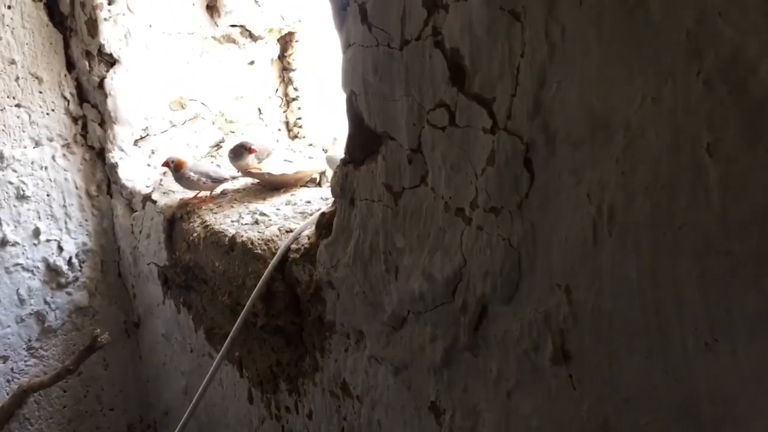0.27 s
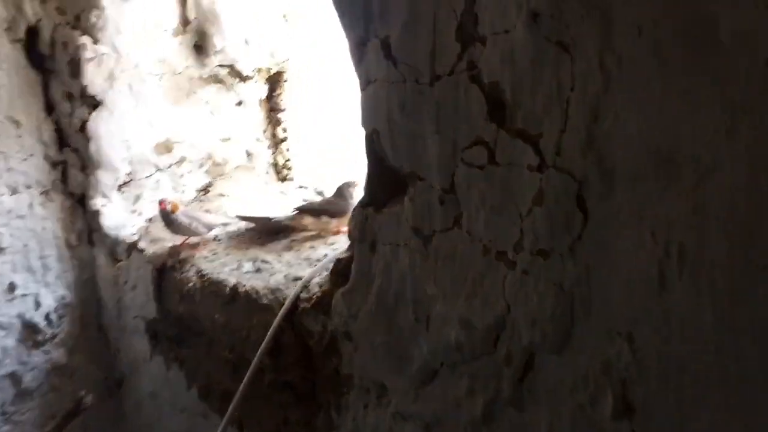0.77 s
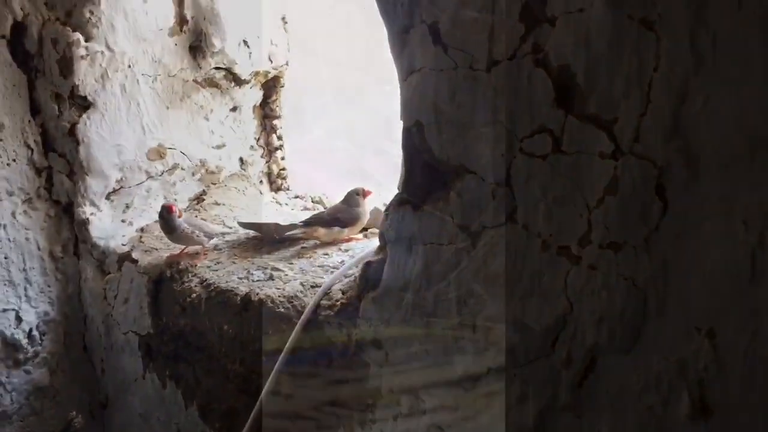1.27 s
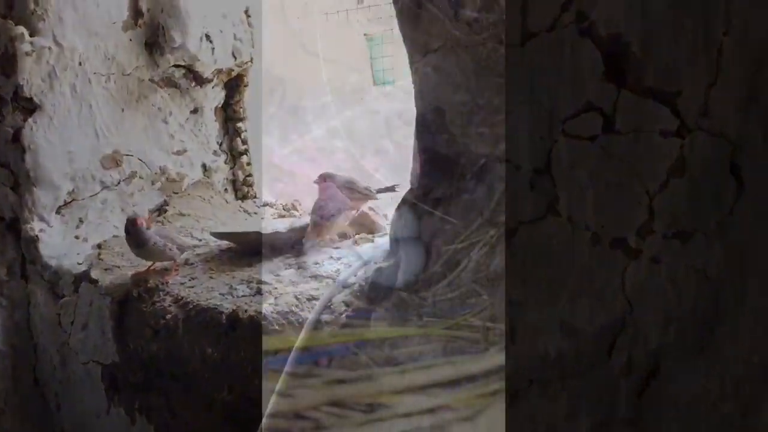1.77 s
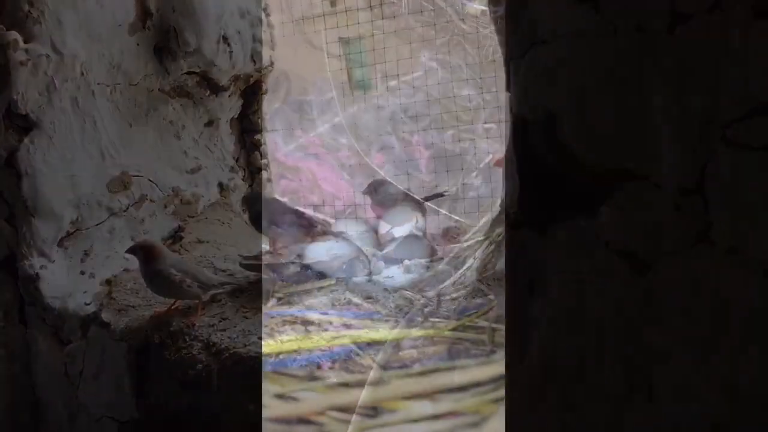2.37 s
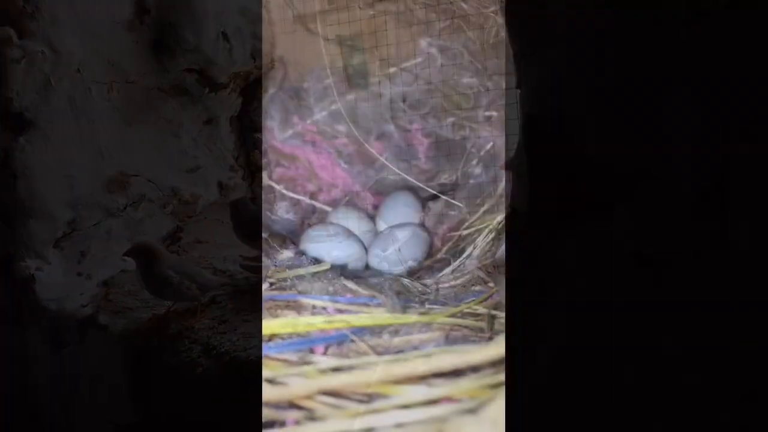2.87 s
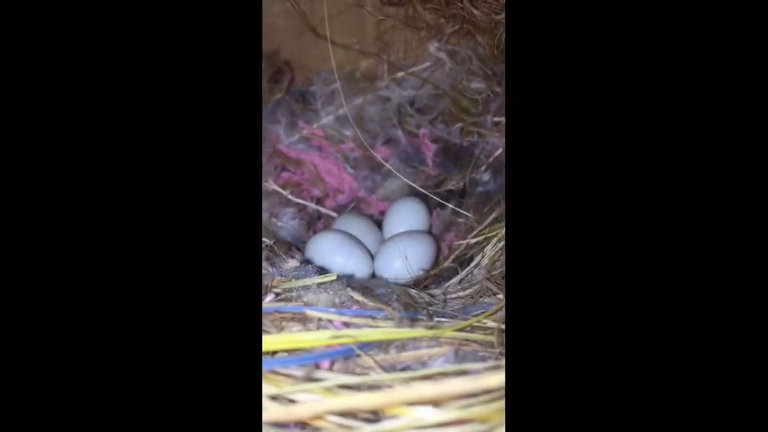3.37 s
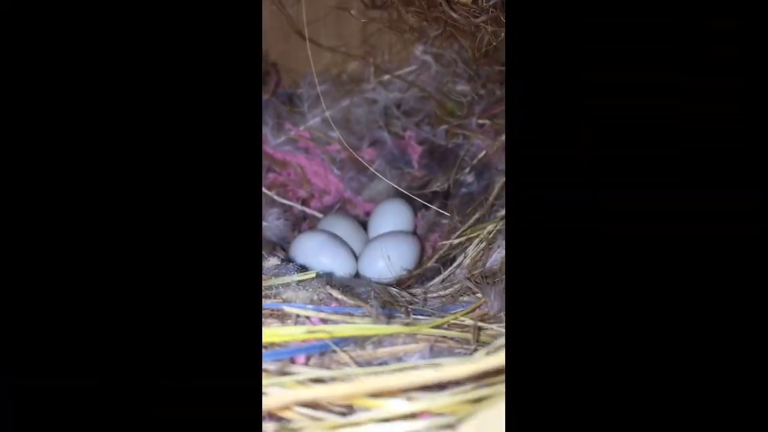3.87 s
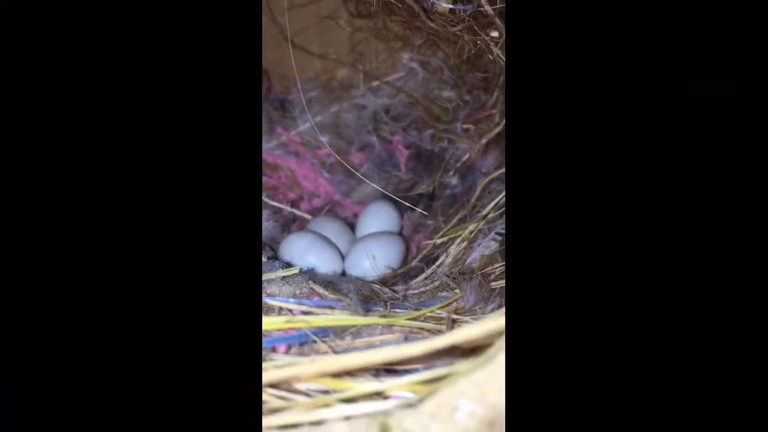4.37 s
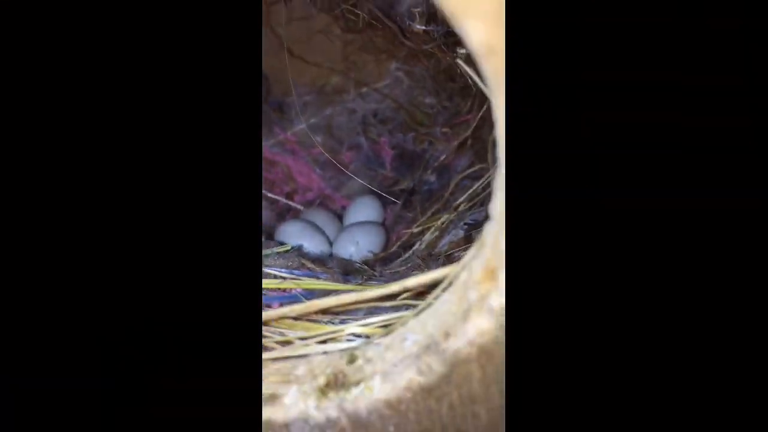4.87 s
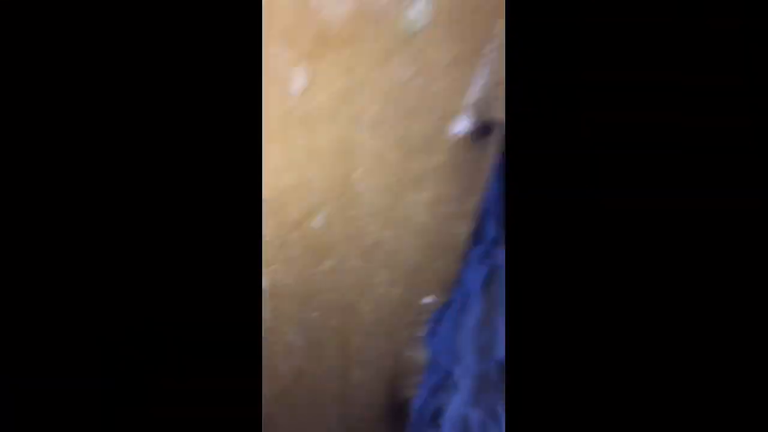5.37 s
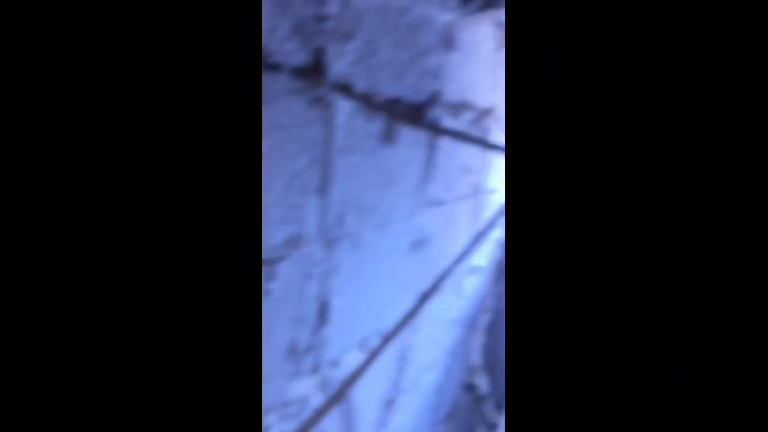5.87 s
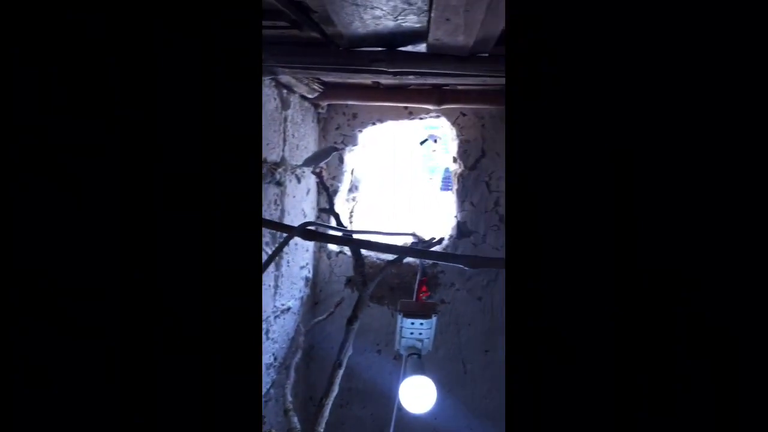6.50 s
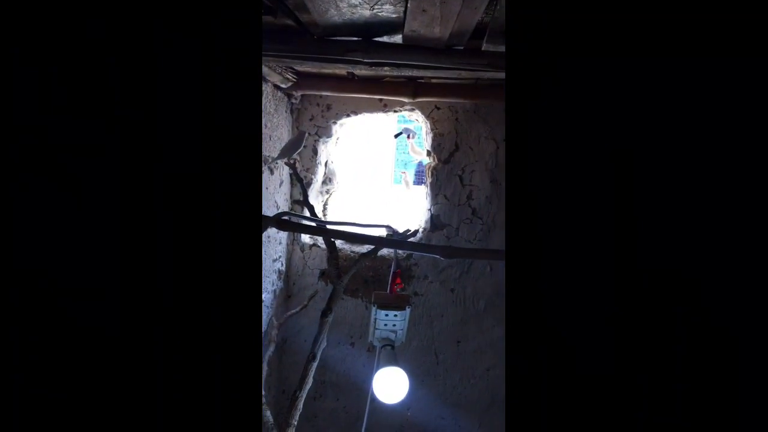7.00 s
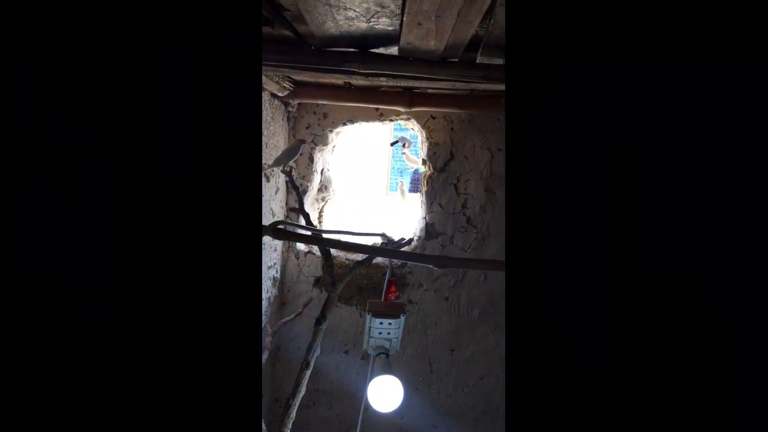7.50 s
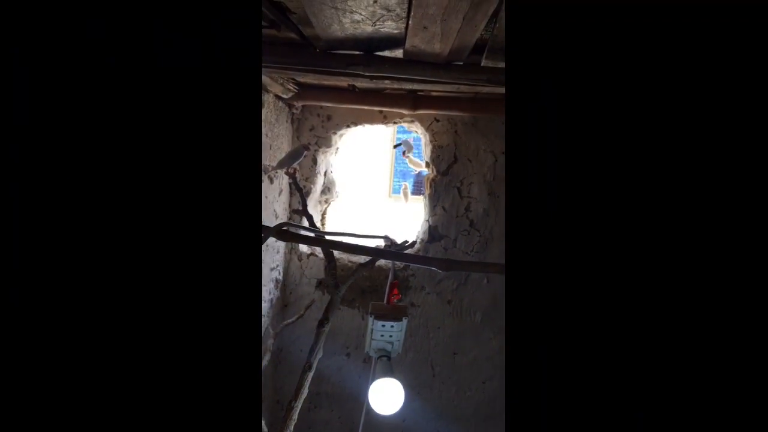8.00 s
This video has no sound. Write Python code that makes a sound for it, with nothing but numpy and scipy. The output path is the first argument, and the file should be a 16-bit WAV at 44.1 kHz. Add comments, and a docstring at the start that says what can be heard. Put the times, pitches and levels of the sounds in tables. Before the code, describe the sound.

Inside a small plastered room, finches call close to a hand-held microphone, with quick dense wall echoes. Short nasal chips, each flicking up then dropping, start at 0.2 s; a tumbling falling whistle phrase with a soft mew comes near 0.6 s, and more chips at 0.9-1.3 s. A brief wing flutter passes around 1.75 s. From 2.1 s chips return, then a slower whistled tumble at 2.4 s and two harsh, shaky screeches at 2.75 and 2.93 s, while low handling rumble swells. A chip is cut short near 3.36 s. Three chips bunch at 3.8 s; after a lull, chips continue from 4.4 to 6.1 s, some bright and rough, with a low mew at 5.9 s. Rumble and room noise surge near 6.2 s, wings whirr in several quick beats around 6.5 s, then chips and quiet whistled phrases at 6.6 and 7.0 s lead to final chips until about 8.1 s. Faint ticks and hiss throughout.

```python
"""Finches in a plastered room

Finches call close by: short arching chips, tumbling whistled phrases, nasal mews and two harsh screeches.
The voices are harmonic stacks on moving pitch tracks, shaded by throat, beak and breath noise.
Wings whirr as a bird flies across and feet tick on a ledge, all as shaped noise with wall echoes.
The hand-held microphone rumbles as it is moved, over faint room noise and hiss."""
import sys
import numpy as np
from scipy import signal
from scipy.fft import rfft, irfft, next_fast_len
from scipy.io import wavfile
from scipy.ndimage import uniform_filter1d

SR = 44100
rng = np.random.default_rng(int(sys.argv[2]) if len(sys.argv) > 2 else 0)


def generate_wav(signal):
    """Clip the signal to [-1, 1] and save it as 16-bit WAV at the path in sys.argv[1]."""
    frames = np.transpose(np.atleast_2d(signal))
    scaled = np.clip(frames, -1, 1) * 32767
    pcm = np.round(scaled).astype(np.int16)
    wavfile.write(sys.argv[1], SR, pcm)


N = 363472
CALL_SIZE = 16384   # samples rendered per sound, echoes included
LEVEL_WINDOW_S = .035   # opening of a sound over which its level is set


def from_db(db):
    """Decibels to gain."""
    return 10 ** (np.asarray(db) / 20)


def rms_one(x):
    """Scale to unit rms."""
    return x / np.sqrt(np.mean(x ** 2) + 1e-20)


def in_time(rows):
    """Each level column of an automation table at every sample."""
    t, *columns = np.transpose(rows)
    return [np.interp(np.arange(N) / SR, t, column) for column in columns]


def at_hz(points, hz):
    """Read a spectrum on a log-frequency axis."""
    f, value = np.transpose(points)
    return np.interp(np.log(np.maximum(hz, 1)), np.log(f), value)


def coloured_noise(spectrum, size):
    """Noise of unit rms with the given spectrum."""
    padded = next_fast_len(size)
    gain = from_db(at_hz(spectrum, np.fft.rfftfreq(padded, 1 / SR)))
    white = rfft(rng.standard_normal(padded))
    return rms_one(irfft(white * gain, padded)[:size])


def wobble(rate_hz):
    """Random unsteadiness over one call, slower than the given rate, spread 1."""
    lowpass = signal.butter(2, rate_hz, fs=SR, output="sos")
    return rms_one(signal.sosfilt(lowpass, rng.standard_normal(CALL_SIZE)))


def progress(length_s):
    """Runs from 0 to 1 while a call lasts, then holds."""
    return np.clip(np.arange(CALL_SIZE) / SR / max(length_s, .004), 0, 1)


def glide(start, end, u):
    """Straight slide from start to end."""
    return start + (end - start) * u


def swell(u, edge):
    """Rounded rise and fall, each taking a share of the call."""
    return np.sin(np.pi / 2 * np.clip(np.minimum(u, 1 - u) / edge, 0, 1)) ** 2


def harmonics(pitch, level_db, count):
    """Harmonic stack on a pitch track; level_db(k, Hz) sets each partial."""
    phase = 2 * np.pi * np.cumsum(pitch) / SR
    voice = np.zeros(len(pitch))
    for k in range(1, count + 1):
        hz = k * pitch
        voice += from_db(level_db(k, hz)) * (hz < SR / 2) * np.sin(k * phase)   # no aliases
    return voice


# decay of the wall echoes, band by band: f/Hz, reverberation time/s
WALL_DECAY = [(500, 0.17), (2000, 0.14), (4000, 0.13), (8000, 0.09), (15000, 0.15)]
ECHO_DB = 4   # total echo energy against the direct sound


def room(x, build_s=0.00074, late_db=-27, late_t60=0.27):
    """Direct sound plus dense wall echoes, different for every sound, and a faint late tail."""
    t, hz = np.arange(CALL_SIZE) / SR, np.fft.rfftfreq(CALL_SIZE, 1 / SR)
    white = rfft(rng.standard_normal(CALL_SIZE))
    centres = [f for f, t60 in WALL_DECAY]
    echoes = np.zeros(CALL_SIZE)
    for share, (f, t60) in zip(np.eye(len(centres)), WALL_DECAY):
        band = irfft(white * np.interp(hz, centres, share))
        early = 1000 ** (-t / t60)
        late = from_db(late_db) * 1000 ** (-t / late_t60)
        echoes += band * (early + late)
    echoes *= 1 - np.exp(-t / build_s)
    response = from_db(ECHO_DB) * echoes / np.linalg.norm(echoes)
    return x + signal.fftconvolve(x, response)[:CALL_SIZE]


def add(out, t, sound, level_db):
    """Place a sound so that its opening has the given rms level."""
    start = max(round(t * SR), 0)
    opening = np.sqrt(np.mean(sound[:round(LEVEL_WINDOW_S * SR)] ** 2) + 1e-20)
    out[start:start + CALL_SIZE] += (from_db(level_db) / opening * sound)[:N - start]


# movement of the microphone: t/s, deep rumble level before trim/dB, flutter level before trim/dB
MIC_MOVEMENT = [(0.0, -50.0, -57.5), (0.33, -55.5, -63.0), (0.88, -55.5, -64), (1.0, -49.5, -57.0),
                (1.22, -59.0, -67.0), (1.28, -51.0, -68.0), (1.65, -53.5, -55.0), (1.73, -47, -38.5),
                (1.86, -46, -47), (1.95, -45, -38), (2.06, -45, -46), (2.23, -38, -39.5),
                (2.53, -36.5, -43.5), (2.58, -39.5, -53.5), (2.75, -40, -51), (3.03, -43.5, -45.5),
                (3.15, -47.5, -49), (3.62, -50, -50), (3.73, -46.0, -44.5), (4.24, -46.5, -45.5),
                (4.38, -56.5, -49.0), (4.44, -44.5, -41.5), (4.86, -58.0, -60.5), (5.16, -68.0, -62.5),
                (5.35, -57.0, -64.0), (5.4, -43.5, -43.0), (5.74, -49.0, -50.5), (5.79, -41.0, -47.0),
                (6.12, -46.5, -48.0), (6.2, -35.5, -37.5), (6.58, -45.5, -49.0), (7.0, -46, -51),
                (7.21, -45.5, -42), (7.34, -54.0, -55.0), (7.63, -55.0, -54.0), (7.74, -64.0, -69.0),
                (7.94, -66.5, -65.5), (8.07, -45.5, -52.5), (8.24, -62.0, -59.0)]
# colour of the deep rumble: f/Hz, level/dB
RUMBLE_COLOUR = [(20, -22), (40, 1), (65, 4), (90, 12), (120, 9.5), (150, -8), (220, -42)]
# colour of the flutter above it: f/Hz, level/dB
FLUTTER_COLOUR = [(90, -25), (145, 6.5), (200, 0.5), (300, -8), (400, -18), (550, -46.5), (900, -68)]


def handling(rumble_trim_db=-2.0, flutter_trim_db=-2.6, evenness=1.0):
    """Low rumble and flutter of the moving microphone, their strength following the movement."""
    def steady(spectrum):
        """Noise with its own swells ironed out."""
        noise = coloured_noise(spectrum, N)
        power = uniform_filter1d(noise ** 2, size=3000) + 1e-6
        return rms_one(noise / power ** (evenness / 2))

    rumble_db, flutter_db = in_time(MIC_MOVEMENT)
    rumble = from_db(rumble_db + rumble_trim_db) * steady(RUMBLE_COLOUR)
    flutter = from_db(flutter_db + flutter_trim_db) * steady(FLUTTER_COLOUR)
    return rumble + flutter


# background bed: t/s, room noise level/dB, hiss level/dB
BED_LEVELS = [(0, -72, -76), (1.24, -68, -76), (1.67, -71, -77), (2.08, -66, -73), (2.27, -51, -66),
              (2.45, -62, -68), (2.7, -63, -72), (2.94, -55, -71), (3.1, -67, -76.5), (4.4, -65.5, -75.5),
              (5.3, -67, -74), (5.78, -68, -66), (5.94, -49.5, -61.5), (6.4, -54, -64), (6.61, -49, -67),
              (6.89, -60, -67), (7.1, -57, -64.5), (7.5, -66, -73), (7.87, -70, -77), (8.08, -53, -65),
              (8.24, -70, -69)]
# colour of the room noise ahead of the resonances: f/Hz, level/dB
ROOM_NOISE_COLOUR = [(300, 7.5), (550, -1.5), (1000, 3.5), (1500, 0.5), (2400, 1.5), (3500, -4),
                     (5000, -17.5), (8000, -19.5)]
# colour of the hiss: f/Hz, level/dB
HISS_COLOUR = [(2500, -0.5), (4500, 4.5), (7000, 1), (10000, -5), (13000, -3), (16000, -14)]


def background():
    """Faint noise, ridged by the resonances of the room, and a smooth hiss."""
    room_db, hiss_db = in_time(BED_LEVELS)
    resonances = room(signal.unit_impulse(CALL_SIZE))
    noise = coloured_noise(ROOM_NOISE_COLOUR, N + CALL_SIZE - 1)
    air = rms_one(signal.fftconvolve(noise, resonances, "valid"))
    return from_db(room_db) * air + from_db(hiss_db) * coloured_noise(HISS_COLOUR, N)


# chips: t/s, length/s, pitch that scales the arch f/Hz, level before trim/dB,
# upper throat resonance/dB, treble from the open beak/dB, odd harmonics at the start/dB
CHIP_CALLS = [(.198, .022, 1144, -29.5, 4.5, 3, -11), (.908, .029, 1087, -35.5, 1.5, 10, 3),
              (1.198, .019, 1106, -30.7, .3, 2.5, -11), (1.297, .023, 1168, -27.5, .5, 3.2, -16),
              (2.073, .019, 1101, -28.5, 2.5, 2, -25), (2.153, .02, 1005, -36.5, -1, 0, -13),
              (2.25, .032, 1016, -38.5, -1.6, 1, -6), (2.846, .023, 1035, -30.5, 1, 8, -21),
              (3.234, .022, 1062, -36.5, -1, -5, -21), (3.342, .018, 1103, -39, 1, 3, 8),
              (3.455, .026, 1124, -35, -.5, -3, -25), (3.762, .022, 1158, -32, -2, -2.5, -34),
              (3.807, .023, 1432, -31.5, 4, 8, -28), (3.841, .027, 1266, -30.5, 2, 3, -30),
              (4.416, .028, 1400, -32.5, .5, 11, 2), (4.631, .019, 1138, -32.5, -3, -3, -16),
              (4.712, .024, 1144, -28.5, 0, .5, -21), (4.889, .024, 1530, -32.5, -2, 9.5, 1),
              (5.03, .024, 1172, -28.5, .5, 6.5, -14), (5.244, .027, 1174, -30, -.5, 8, -40),
              (5.415, .027, 1530, -28.5, 3.8, 12, 3.5), (5.741, .026, 1170, -27.5, 4.5, 8, -12),
              (5.861, .016, 1144, -31.5, 2.5, 5, -20), (5.897, .023, 1457, -33.5, -2, -12, 2),
              (6.121, .021, 1225, -26, 4.8, 8.5, -23), (6.764, .029, 1148, -28, 2.5, 4, -4),
              (6.901, .03, 1617, -29.5, 4, 14, 5.5), (7.332, .025, 1130, -31.5, .8, 2, -10),
              (7.548, .024, 1500, -31.5, 4.5, 12.5, 3.5), (7.576, .019, 1094, -38.5, -3, 8, -5),
              (7.61, .031, 1083, -35.5, -4.5, -4, 6), (7.77, .026, 1130, -33, .3, 1, -20),
              (7.926, .024, 1139, -28.5, 2, 8.5, 3.5), (8.069, .027, 1070, -38, -3, -4, 8)]
# pitch arch of one chip: share of its length, pitch ratio before the random bend
PITCH_ARCH = [(0, .82), (.22, .99), (.42, 1.01), (.6, .87), (0.802, .7), (1, 0.462)]
# the bird's throat and beak, shared with the mews: f/Hz, level/dB
THROAT_COLOUR = [(500, -66), (1000, -28.5), (1350, -6.5), (1800, 2.5), (2300, 1.5), (2750, 1), (3300, 3),
                 (4000, 0), (4700, -6.5), (5600, -18.5), (7000, -25.5), (9000, -29.5), (12000, -35),
                 (15500, -36)]
BREAK_S = 3.361   # chips begun before this moment stop dead here, echoes included
CHIP_JITTER = .036   # pitch jitter share once broken; half of it before
CLEAN_ODD_DB = -14   # odd-harmonic level at which the breath has its nominal level
# the hardest push comes at this share of a chip, later when the beak is wide
PUSH_SHARE, PUSH_PER_TREBLE_DB = .42, .01


def chips(breath_db=-12, harsh_breath=0.73, shimmer=0.34, start_force=.38, release_force=0.41,
          arch_spread=0.1983, top_share=0.2, lowest_hz=850, trim_db=-1.0):
    """The syrinx flicks up and down in pitch; at the hardest push it breaks an octave down and turns rough."""
    out = np.zeros(N)
    chip_highpass = signal.butter(2, lowest_hz, "highpass", fs=SR, output="sos")   # chips carry nothing below this
    for t, length, top_hz, level_db, upper_db, treble_db, odd_db in CHIP_CALLS:
        u = progress(length)
        push = np.clip(PUSH_SHARE + PUSH_PER_TREBLE_DB * treble_db, .2, .75)
        force = np.interp(u, [0, push / 3, push * 2 / 3, push, (1 + push) / 2, 1],
                          [0, start_force, .5, 1, release_force, 0])
        unbroken = np.clip(2 - 2 * u / push, 0, 1)   # odd harmonics lose their offset as this falls to 0
        beak = [(2300, 0.0038), (3300, upper_db), (4800, upper_db),
                (5600, treble_db), (8500, treble_db), (12000, top_share * treble_db)]
        throat = [(hz, db + at_hz(beak, hz)) for hz, db in THROAT_COLOUR]
        bend = 1 + arch_spread * rng.standard_normal()   # no two chips bend alike
        arch = np.interp(u, *np.transpose(PITCH_ARCH)) ** bend
        pitch = top_hz * arch * (1 + CHIP_JITTER * (1 - unbroken / 2) * wobble(640))
        voice = harmonics(pitch, lambda k, hz: at_hz(throat, hz) + k % 2 * odd_db * unbroken, count=13)
        # a chip that is broken from its very start is also the noisier one
        rasp_db = breath_db + harsh_breath * (odd_db - CLEAN_ODD_DB)
        rasp = from_db(rasp_db) * coloured_noise(throat, CALL_SIZE)
        sound = room((voice * (1 + shimmer * wobble(405)) + rasp) * force)
        sound = signal.sosfilt(chip_highpass, sound)
        if t < BREAK_S:
            sound = sound * (t + np.arange(CALL_SIZE) / SR < BREAK_S)
        add(out, t, sound, level_db + trim_db)
    return out


# claws and beaks ticking: t/s, level/dB
TICK_HITS = [(0.549, -53.5), (0.962, -49), (1.020, -63), (1.546, -60.5), (1.917, -53), (2.615, -50),
             (5.354, -60.5), (7.09, -53), (8.038, -60)]
# colour of a tick: f/Hz, level/dB
TICK_SPECTRUM = [(300, 4.5), (1000, -2), (3000, 6.5), (6000, -7.5), (10000, -9), (15000, -14)]


def ticks(decay_s=0.0069):
    """Brief dry contacts on plaster: noise that dies away exponentially."""
    out = np.zeros(N)
    decay = np.exp(-np.arange(CALL_SIZE) / SR / decay_s)
    for t, level_db in TICK_HITS:
        add(out, t, room(coloured_noise(TICK_SPECTRUM, CALL_SIZE) * decay), level_db)
    return out


# nasal, many-lined notes: t/s, length/s, start f/Hz, end f/Hz, level/dB,
# fundamental boost/dB, pitch jitter share
MEW_NOTES = [(.552, .144, 978, 980, -54, 31.5, .03), (.82, .017, 1054, 855, -59.5, 42, .04),
             (1.049, .009, 1300, 1580, -49.5, 21, .04), (1.47, .012, 1320, 1190, -59.5, 30, .04),
             (2.7, .066, 680, 750, -51.5, 12, .0055), (3.68, .02, 1000, 1280, -55, 25, .04),
             (5.92, .164, 544, 536, -53, 25, .019), (7.295, .036, 1070, 1050, -56, 33, .015),
             (8.115, .022, 900, 810, -57, 22, .022)]


def mews(edge=0.081):
    """Soft notes with a low pitch and many harmonics, coloured by the throat."""
    out = np.zeros(N)
    for t, length, start_hz, end_hz, level_db, fundamental_db, jitter in MEW_NOTES:
        u = progress(length)
        pitch = glide(start_hz, end_hz, u) * (1 + jitter * wobble(300))
        voice = harmonics(pitch, lambda k, hz: at_hz(THROAT_COLOUR, hz) + fundamental_db * (k == 1), count=12)
        add(out, t, room(voice * swell(u, edge)), level_db)
    return out


# tumbling phrase, five falling notes hopping between two registers, before each singing scales it:
# t from its start/s, length/s, start f/Hz, end f/Hz, relative level/dB
PHRASE_SHAPE = [(0, .035, 3400, 3020, 0), (.028, .024, 4050, 3700, -4.5), (.046, .021, 2850, 2150, -5),
                (.08, .023, 3330, 2950, -4), (.099, .029, 1980, 1620, -7)]
# each singing of it: t/s, duration factor, high-register pitch factor, low-register pitch factor,
# level before trim/dB
PHRASE_TAKES = [(.569, 1.0, .99, 1.04, -33.5), (2.419, 1.56, .91, .78, -31.5), (6.592, 1.12, 1.0, .89, -39),
                (7.011, 1.02, 1.02, .96, -37)]
REGISTER_SPLIT_HZ = 3100   # notes starting above this belong to the high register
NOTE_STRETCH = .45   # power of the phrase's duration factor by which its notes lengthen


def phrase_notes():
    """The one phrase, sung slower or faster, each of its two registers a little higher or lower."""
    notes = []
    for t, stretch, high, low, level_db in PHRASE_TAKES:
        for after, length, start_hz, end_hz, note_db in PHRASE_SHAPE:
            shift = high if start_hz > REGISTER_SPLIT_HZ else low
            note_length = length * stretch ** NOTE_STRETCH
            notes.append((t + after * stretch, note_length,
                          start_hz * shift, end_hz * shift, level_db + note_db))
    return notes


# single whistled notes, near and far: t/s, length/s, start f/Hz, end f/Hz, level before trim/dB
SINGLE_WHISTLES = [(.56, .017, 4570, 4400, -53.8), (2.393, .014, 2750, 3320, -38.5),
                   (2.405, .017, 2340, 1970, -41.3), (2.488, .025, 3500, 2900, -37),
                   (2.738, .018, 2850, 2940, -39.5), (2.823, .017, 1880, 1180, -44),
                   (3.045, .027, 3070, 2930, -43.5), (3.084, .032, 2670, 2390, -48.4),
                   (3.141, .014, 2075, 1750, -50), (3.861, .035, 2620, 2385, -43),
                   (3.9, .16, 1047, 850, -68), (4.18, .15, 2353, 2347, -69), (4.562, .11, 2495, 2400, -62),
                   (4.677, .022, 1360, 1170, -53.5), (4.762, .048, 1960, 1634, -52.5),
                   (5.393, .023, 2586, 3550, -29), (5.902, .011, 3140, 3084, -30),
                   (6.135, .02, 1020, 900, -52), (7.187, .012, 2544, 3520, -32.5),
                   (7.197, .009, 3500, 2300, -37)]
# airy rasp that rides on the whistles: f/Hz, level/dB
WHISTLE_AIR = [(800, -14), (2000, 2), (4000, 1), (5000, -18), (6500, -1), (9000, -5.5), (11000, -23),
               (15000, -25)]


def whistles(jitter=0.042, shimmer=0.46, overtone_db=-27, rasp_db=-24, octave_db=12, edge=0.11, trim_db=-1.0):
    """Nearly pure, quavering notes that slide and hop between two registers, louder where they are higher."""
    out = np.zeros(N)
    for t, length, start_hz, end_hz, level_db in phrase_notes() + list(SINGLE_WHISTLES):
        u = progress(length)
        slide = glide(start_hz, end_hz, u)
        height_gain = from_db(octave_db * np.log2(slide / start_hz))
        force = swell(u, edge) * height_gain * (1 + shimmer * wobble(280))
        if end_hz > start_hz:
            force = force * np.minimum(.15 + 1.3 * u, 1)   # rising notes swell from a soft start
        pitch = slide * (1 + jitter * wobble(490))
        voice = harmonics(pitch, lambda k, hz: overtone_db * np.log2(k), count=4)
        rasp = from_db(rasp_db) * coloured_noise(WHISTLE_AIR, CALL_SIZE)
        add(out, t, room((voice + rasp) * force), level_db + trim_db)
    return out


# bursts of wing beats: t of the loudest beat/s, beats before it, beats after it, level/dB,
# rise per beat/dB, fall per beat/dB, brightness/dB per octave
WING_BURSTS = [(1.75, 1, 2, -44, 16, 8, 1.2), (2.604, 0, 0, -53, 0, 0, 0), (6.27, 0, 1, -51, 0, 4, -1.5),
               (6.489, 2, 4, -36.5, 2.7, 4, 0), (7.57, 0, 0, -55, 0, 0, 0)]
BEAT_PERIOD_S, STROKE_S = .05, .043


def wing_beats():
    """Evenly spaced strokes that grow as the bird nears and fade as it leaves."""
    beats = []
    for t, before, after, level_db, rise_db, fall_db, tilt_db in WING_BURSTS:
        for k in range(-round(before), round(after) + 1):
            beat_db = level_db + min(k * rise_db, -k * fall_db)
            beats.append((t + k * BEAT_PERIOD_S, beat_db, tilt_db))
    return beats


# colour of a wing stroke before its brightness tilt: f/Hz, level/dB
WING_SPECTRUM = [(150, -3.5), (400, -1), (620, -1), (725, 0.5), (850, -1), (1100, -5.5), (1700, -3.5),
                 (2700, -9), (4500, -19.5), (8000, -28), (15000, -42.5)]


def wings(grain=0.33, grain_hz=160):
    """Each stroke is a puff of air, roughened by the feathers."""
    out = np.zeros(N)
    for t, level_db, tilt_db in wing_beats():
        colour = [(hz, db + tilt_db * np.log2(hz)) for hz, db in WING_SPECTRUM]
        puff = coloured_noise(colour, CALL_SIZE) * (1 + grain * wobble(grain_hz))
        add(out, t, room(puff * swell(progress(STROKE_S), 0.16)), level_db)
    return out


# screeches: t/s, length/s, pitch f/Hz, level before trim/dB, second harmonic/dB, half-pitch rasp/dB
SCREECH_CALLS = [(2.744, 0.12, 2885, -33.5, 0, -3), (2.927, 0.11, 2990, -31, 3.5, -8)]


def screeches(jitter=0.068, third_db=-13, fourth_db=-21, shimmer=1.0, edge=0.42, trim_db=-4):
    """Forced hard, the syrinx turns chaotic: pitch and strength shake, and a half-pitch rasp fills the gaps."""
    out = np.zeros(N)
    for t, length, pitch_hz, level_db, second_db, rasp_db in SCREECH_CALLS:
        # partials of the half pitch: every second one is a harmonic of the screech itself
        partial_db = [-32, 0, rasp_db, second_db, rasp_db - 7, third_db, rasp_db - 32.5, fourth_db, -32, -29]
        half_pitch = pitch_hz / 2 * (1 + jitter * wobble(700))
        voice = harmonics(half_pitch, lambda k, hz: partial_db[k - 1], count=10)
        voice = voice * (1 + shimmer * wobble(446))
        add(out, t, room(voice * swell(progress(length), edge)), level_db + trim_db)
    return out


def scene():
    """All birds and noises at one microphone."""
    birds = chips() + ticks() + mews() + whistles() + wings() + screeches()
    return (handling() + background() + birds)[None]


def record(dry, cutoff_hz=15900):
    """The top is cut steeply."""
    return signal.sosfilt(signal.ellip(12, .1, 70, cutoff_hz, fs=SR, output="sos"), dry)


dry = scene()
out = record(dry)
generate_wav(out)
```